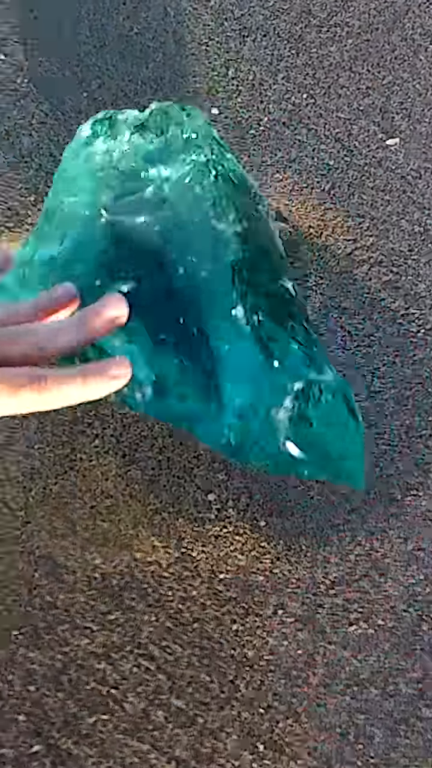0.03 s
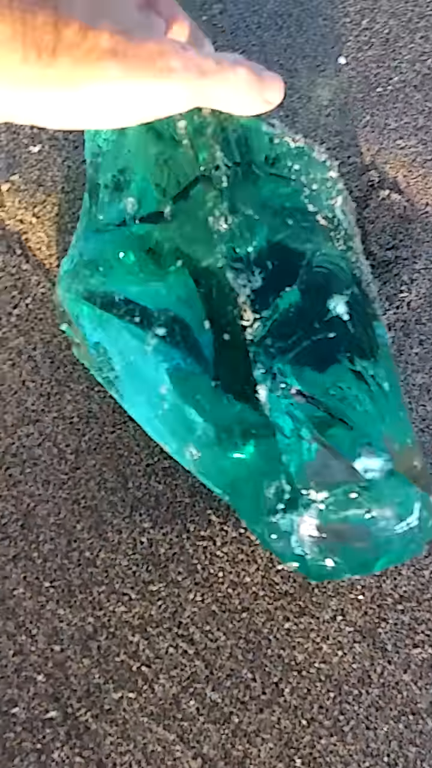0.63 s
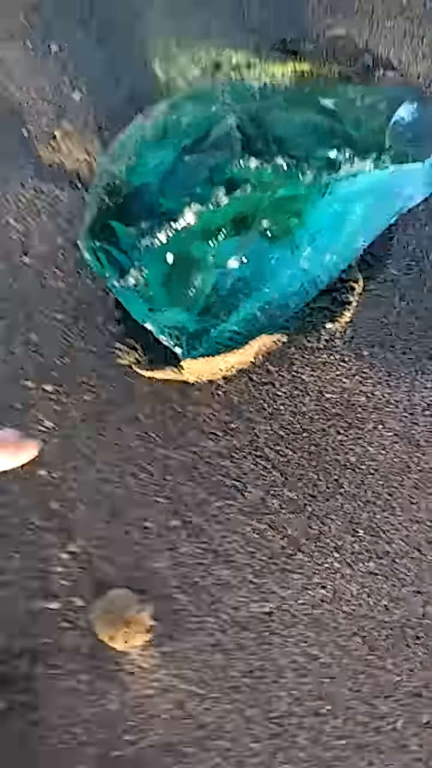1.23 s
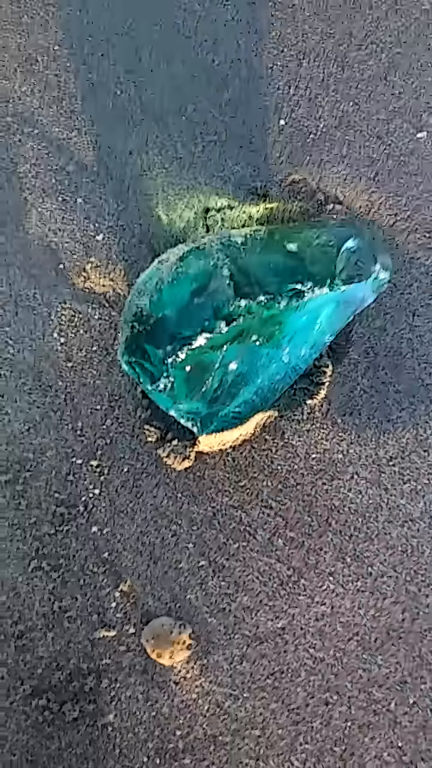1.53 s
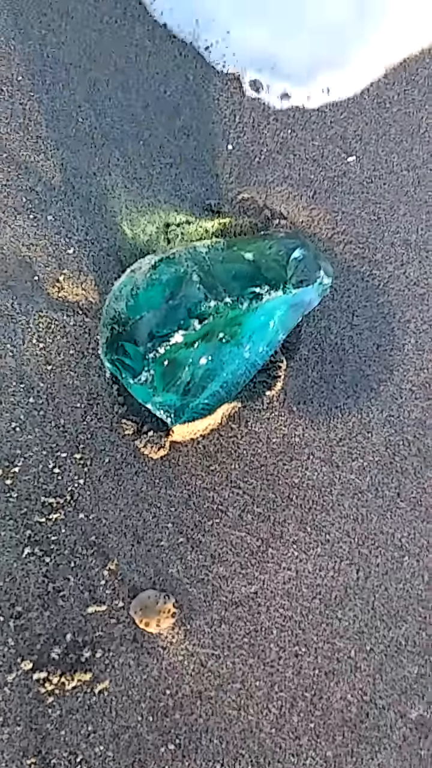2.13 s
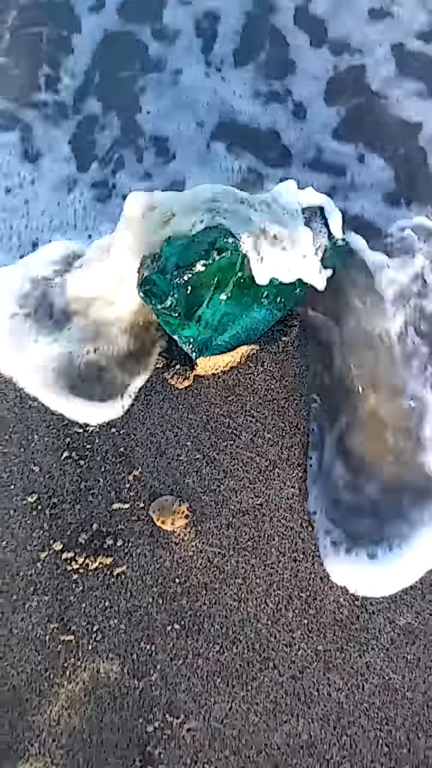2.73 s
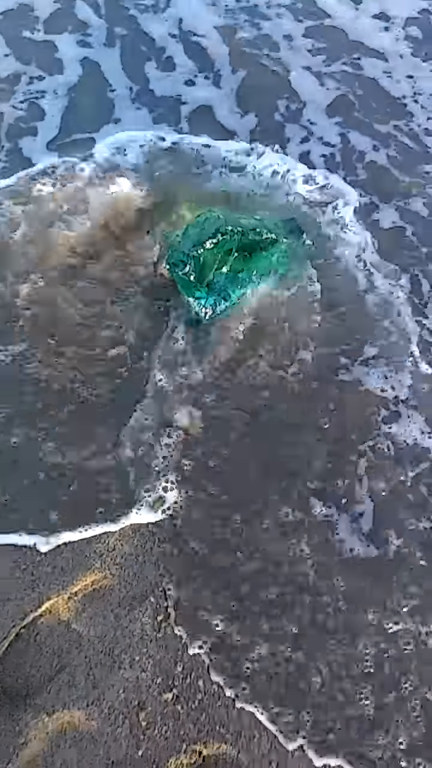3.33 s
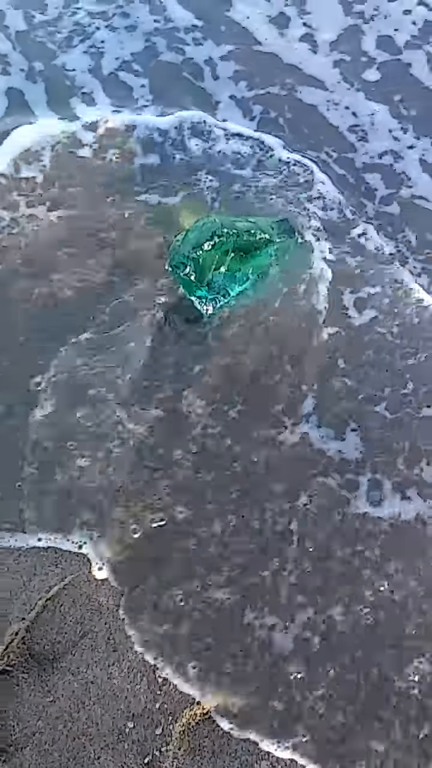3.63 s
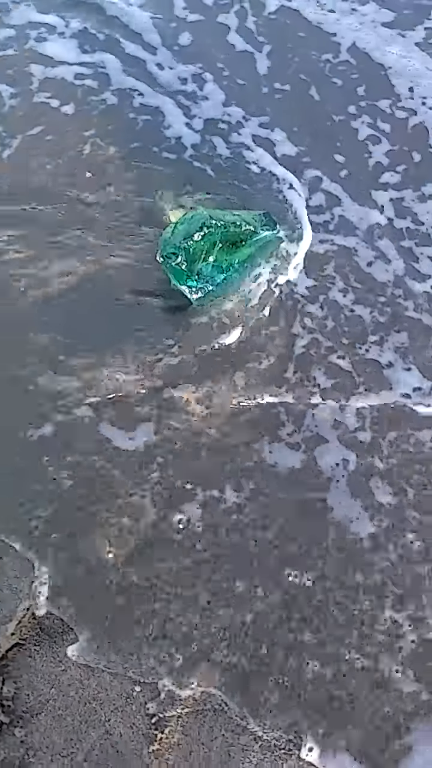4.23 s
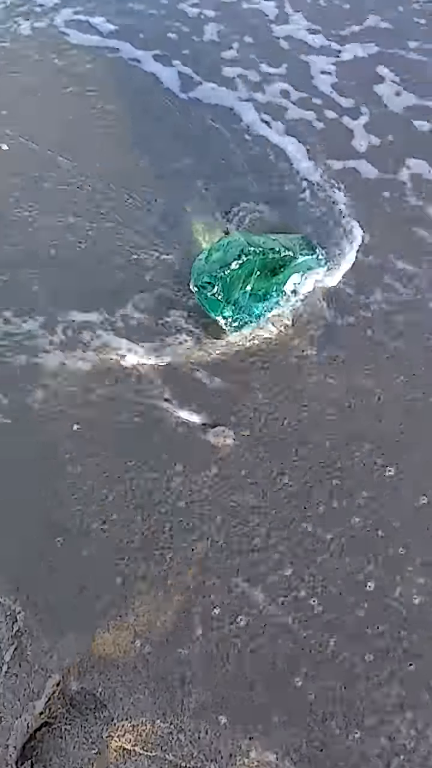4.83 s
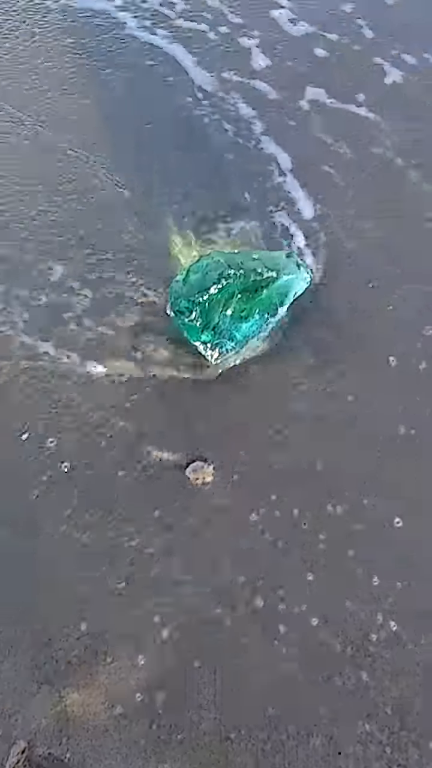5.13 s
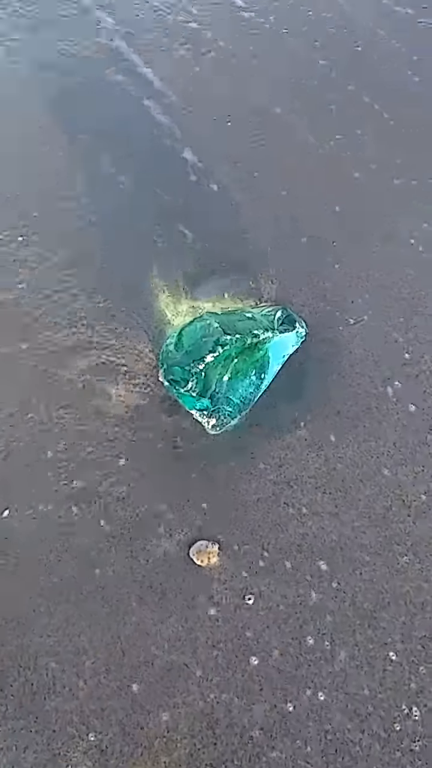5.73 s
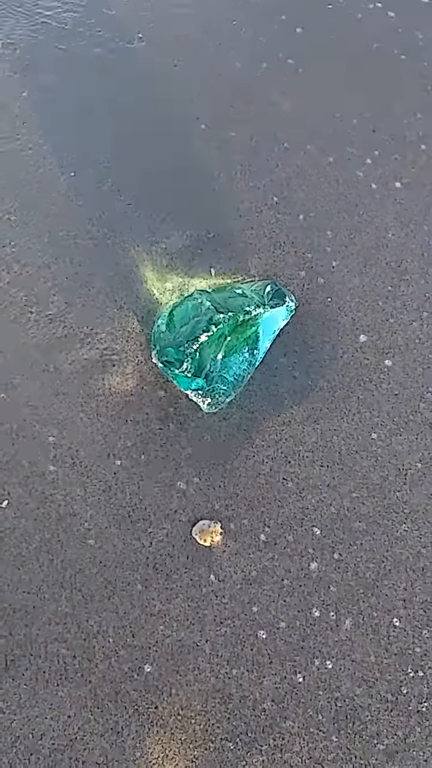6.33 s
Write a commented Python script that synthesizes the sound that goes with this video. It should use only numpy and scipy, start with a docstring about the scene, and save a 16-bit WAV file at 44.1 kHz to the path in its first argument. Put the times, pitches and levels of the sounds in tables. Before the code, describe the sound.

Gusty wind thumps on the microphone as a glass block crunches in wet sand, then a foamy wave washes up and drains away.

```python
"""On a windy beach, a block of glass is turned over in wet sand, which crunches and hisses.
Then a foamy wave runs up around it and drains back: the water rushes and bubbles, its thin
sheet hisses over the sand, and the foam fizzes. Loudest of all, gusts sweep eddies (swirls of
air) over a phone's microphone opening, making a fluttering rumble with sharp thumps.
A limiter holds down the peaks."""
import sys
import numpy as np
from scipy import signal
from scipy.fft import rfft, irfft
from scipy.io import wavfile
from scipy.ndimage import uniform_filter1d, minimum_filter1d, map_coordinates

SR = 44100
rng = np.random.default_rng(int(sys.argv[2]) if len(sys.argv) > 2 else 0)


def unload_wav(signal):
    """Save mono or channel-first audio to the path in sys.argv[1] as 16-bit WAV at rate SR, clipped to [-1, 1]."""
    wavfile.write(
        sys.argv[1],
        SR,
        np.round(np.clip(np.atleast_2d(signal).T, -1, 1) * 32767).astype(np.int16),
    )


N = 282240

# The hardest eddies to hit the microphone. Each row: time in seconds, relative peak in dB, pitch in Hz.
HARD_EDDIES = [(0.218, -1, 387), (.389, 0, 514), (.457, 0, 860), (0.63, -5, 454), (.768, 4, 416),
               (.866, 7, 430), (.927, 6, 373), (0.973, -2, 690), (.99, -4, 610), (1.018, -3, 500),
               (1.086, 2, 383), (1.122, -2, 342), (1.186, -4, 499.5), (1.212, 2.5, 353), (1.333, 2, 506),
               (1.366, -16, 496), (1.407, -5, 620), (1.422, 0, 519), (1.444, -9, 600), (1.531, -1, 377.5),
               (1.645, -3, 517), (1.678, -2, 651), (1.714, -1, 470), (1.75, -8, 376), (1.762, -3.5, 885),
               (1.768, -1, 660), (1.824, 5, 596), (1.836, -5, 480), (2.581, -15, 480.6), (2.592, -1, 643),
               (2.715, -3.5, 440), (2.789, -4.5, 570.6), (2.854, -2, 498.8), (3.053, 2.5, 397.4),
               (3.129, -0.5, 398.8), (3.139, 3, 664.5), (3.318, -5, 850), (3.326, -2, 429.6),
               (3.444, -8, 430), (3.485, 0, 598.3), (3.739, -6, 478), (5.045, -9, 443)]
# The tone of bursting foam and of the finest sand. Each row: frequency in Hz, relative level in dB.
FIZZ_SPECTRUM = [(3500, -25), (5200, -11), (6200, -9), (7000, -2), (7700, 0), (8400, -2.5), (9400, -10.5),
                 (11500, -11.5), (13500, -14.5), (15700, -17)]


def air():
    """Gusts rise, hold and die back into the breeze. Gives the air's level in dB and pace in octaves."""
    # Each row: start in seconds, hold in seconds, level in dB, pace in octaves above the usual.
    gusts = [(.375, 0.11, -10.5, .08), (0.523, .25, -16, -0.13), (.915, .11, -12.5, -0.047),
             (1.08, .135, -13, -.15), (1.328, 0.13, -13.5, 0.19), (1.502, 0.029, -11, -.1),
             (1.598, 0.25, -13, .2), (2.091, .016, -21, 0), (2.169, .055, -17, -0.54),
             (2.293, 0.19, -26, -.45), (2.59, 0.034, -13, -0.045), (2.696, 0.034, -13, 0),
             (2.775, .1, -14, -0.054), (3.085, .07, -13, -.15), (3.2, .14, -14, -0.044),
             (3.42, 0.082, -13, -0.013), (3.617, .035, -11, -0.14), (3.691, 0.086, -16, 0.054),
             (3.934, 0.031, -16.5, -0.019), (4.08, .02, -17, 0), (4.202, .012, -17, 0.0059),
             (4.294, 0.028, -15, 0.065), (5.01, 0.066, -19.5, 0.16), (5.408, .012, -22, -0.22),
             (5.626, 0.055, -34.5, -.1)]
    # The light air between gusts. Each row: time in seconds, level in dB.
    breeze = [(0, -19), (1.25, -21), (1.85, -21), (1.96, -23), (2.01, -39), (2.26, -37), (2.6, -22),
              (3.9, -21), (4.3, -25), (4.45, -33), (4.65, -39), (5.15, -36), (5.9, -46.5), (6.4, -42.5)]
    attack_s, release_s, breeze_octaves = .014, .016, -.05
    t = np.arange(N) / SR
    power = undb(curve(breeze)) ** 2
    weighted_pace = power * breeze_octaves
    for start, hold, db, octaves in gusts:
        rise = np.exp(-(np.maximum(start - t, 0) / attack_s) ** 2)
        fall = np.exp(-np.maximum(t - start - hold, 0) / release_s)
        gust_power = (undb(db) * rise * fall) ** 2
        power += gust_power
        weighted_pace += gust_power * octaves
    return 10 * np.log10(power), weighted_pace / power


def wind_rumble(air_db, pace):
    """A pattern of eddies sweeps past the microphone: faster air sounds both louder and higher."""
    # The tone of the eddies at speed 1. Each row: frequency in Hz, relative level in dB.
    eddy_spectrum = [(25, -41), (42, -46), (70, -12), (125, -3.5), (220, 1.5), (450, -3.5), (700, -12.5),
                     (1000, -22), (1500, -39.5), (2500, -58), (4000, -53.5)]
    t = np.arange(N) / SR
    # A dying breeze breaks up into separate puffs.
    puff_depth_db = np.interp(air_db, [-38, -26], [3.5, .4])
    level_db = air_db + puff_depth_db * (wander(8.56) - .4)
    flutter_db = 6.2 * np.tanh(wander(66) / 2)
    # The air hurries for a moment around each of the hardest eddies.
    surges = sum(np.interp(t, [s - .008, s, s + .012], [0, hz / 800, 0]) for s, _, hz in HARD_EDDIES)
    hurry = np.tanh(surges)
    speed = 2 ** (pace - .07 + .02 * (level_db + 15) + .04 * flutter_db + .45 * hurry)
    pattern = colour(rng.standard_normal(N), eddy_spectrum)
    # Even out the pattern so that it adds no swells of its own.
    pattern /= np.sqrt(uniform_filter1d(pattern ** 2, size=1000, mode="wrap"))
    position = np.cumsum(speed) % (N - 1)
    swept = map_coordinates(pattern, [position], order=3, mode="wrap")
    return unit(swept * undb(flutter_db)) * undb(level_db + .32 + .83 * hurry)


def lesser_eddies(air_db, pace):
    """Strong air sheds extra eddies at random. Gives rows like those of HARD_EDDIES."""
    per_s, usual_hz, weakest_air_db = 16, 500, -16
    eddies = []
    for slot, (when, size, pitch) in enumerate(rng.random((int(per_s * N / SR), 3))):
        time_s = (slot + when) / per_s
        i = min(int(time_s * SR), N - 1)
        if air_db[i] > weakest_air_db:
            peak_db = air_db[i] + 7 + 7 * (size - .5)
            hz = usual_hz * 2 ** (pace[i] + .6 * (pitch - .5))
            eddies.append((time_s, peak_db, hz))
    return eddies


def wind_thumps(eddies):
    """An eddy gives the microphone one push and one pull; the faster it passes, the higher it sounds."""
    core_db, core_speedup = -24.5, 1.87  # its sharp core is weaker and passes faster
    out, t = np.zeros(N), np.arange(N) / SR
    push_pull = lambda phase: phase * np.exp((1 - phase ** 2) / 2)
    for (time_s, db, hz), sign in zip(eddies, rng.choice([-1, 1], len(eddies))):
        phase = 2 * np.pi * hz * (t - time_s)
        near = np.abs(phase) < 10
        core = undb(core_db) * push_pull(core_speedup * phase[near])
        out[near] += sign * undb(db - .8) * (push_pull(phase[near]) + core)
    return out


def wave():
    """Water rushes and bubbles up the beach, and its thin sheet hisses back over the sand."""
    # The swell of the rushing water. Each row: time in seconds, relative level in dB.
    rush_levels = [(1.3, -53), (1.7, -49), (2.1, -56.5), (2.45, -56), (2.85, -39), (3.6, -35.5),
                   (4.25, -31.5), (5.1, -31), (5.7, -35.5), (6.4, -42)]
    # The tones of the rush and of the thin sheet. Each row: frequency in Hz, relative level in dB.
    rush_spectrum = [(150, -18), (320, -6), (390, -0.5), (460, 2), (600, 5.5), (750, 2.5), (860, 3),
                     (1020, 3.5), (1250, 3), (1550, 2.5), (1850, 1.5), (2050, -4), (2300, -15), (3200, -48)]
    sheet_spectrum = [(1800, -9), (2300, -9), (2600, -1), (2850, 3.5), (3300, 2), (4100, 3), (4800, -6),
                      (6000, -10), (9000, -27)]
    turn_s, turn_ease_s = 4.25, .45  # when the flow turns back, and how gently
    fade_in = curve([(1.2, 0), (1.9, .91)])
    rush_db = curve(rush_levels)
    draining = .5 + .5 * np.tanh((np.arange(N) / SR - turn_s) / turn_ease_s)
    # The sheet hisses more as it drains and thins; wet sand always keeps a faint hiss.
    sheet_db = np.maximum(rush_db - 7 + 6 * draining, -54.5)
    rush = colour(grains(per_s=1500, spread_db=1.5, pop_share=.24), rush_spectrum)
    rush *= undb(rush_db + 6 + .9 * wander(11))
    trickle = bubbles(per_s=160, low_hz=469, high_hz=1893, cycles=9, spread_db=3) * undb(rush_db + 1.5)
    sheet = colour(grains(per_s=2500, spread_db=4, pop_share=.35), sheet_spectrum)
    sheet *= undb(sheet_db + .43 * wander(7.2))
    prickle = bubbles(per_s=220, low_hz=2687, high_hz=4420, cycles=15.5, spread_db=5)
    prickle *= undb(sheet_db - 8.5)
    return (rush + trickle + sheet + prickle) * fade_in


def bubbles(per_s, low_hz, high_hz, cycles, spread_db):
    """Trapped air rings briefly, rising in pitch as it nears the surface."""
    out = np.zeros(N + SR)
    for when, pitch, strength in rng.random((int(per_s * N / SR), 3)):
        hz = low_hz * (high_hz / low_hz) ** pitch
        age = np.arange(int(5 * cycles * SR / hz)) * hz / (SR * cycles)  # counted in decay times
        ring = np.sin(2 * np.pi * cycles * age * (1 + .019 * age)) * np.exp(-age)
        level_db = -spread_db * np.log(max(1 - strength, .02))  # most are quiet, a few are loud
        start = int(when * N)
        out[start:start + len(age)] += ring * undb(level_db)
    return unit(out[:N])


def sand():
    """Wet grains crunch, hiss and sparkle under the turning block, then drop to a faint trace."""
    # The grinding. Each row: time in seconds, relative crunch level in dB, relative hiss level in dB.
    grind_levels = [(0, -27.5, -43), (.1, -27.5, -45), (.18, -28.5, -35), (.52, -29, -28.5),
                    (.72, -29, -31.5), (.97, -37.5, -47.5), (1.3, -47, -51)]
    # The tones of the crunch and of the hiss. Each row: frequency in Hz, relative level in dB.
    crunch_spectrum = [(300, 4), (600, 5), (1400, 1.5), (2000, -4.5), (2500, -11), (3200, -21.5),
                       (4500, -41)]
    hiss_spectrum = [(1800, -13), (2700, -8), (3200, -1.5), (3900, -2), (5200, -1.5), (6300, -6.5),
                     (8000, -8.5), (10000, -13.5), (15000, -37)]
    crunch_db, hiss_db = curve(grind_levels, column=1), curve(grind_levels, column=2)
    settling = curve([(1.2, .92), (1.34, .21)])  # the block comes to rest
    crunch = colour(grains(per_s=2500, spread_db=2.5, pop_share=.58), crunch_spectrum)
    crunch *= undb(crunch_db + 9 + wander(17))
    hiss = colour(grains(per_s=4000, spread_db=3, pop_share=.31), hiss_spectrum)
    hiss *= undb(hiss_db + 2.5 + .8 * wander(25))
    sparkle = colour(grains(per_s=3000, spread_db=1, pop_share=.27), FIZZ_SPECTRUM) * undb(hiss_db - 2.5)
    return (crunch + hiss + sparkle) * settling


def foam():
    """Tiny bubbles burst on the wet sand and in the foam, making a high fizz."""
    # The strength of the fizz. Each row: time in seconds, relative level in dB.
    fizz_levels = [(0, -39), (.8, -39), (.98, -45), (1.15, -40), (1.35, -52.5), (1.48, -55), (1.6, -46),
                   (2.2, -45), (3.05, -36), (3.25, -39), (4.7, -35), (5.6, -36), (6.4, -40.5)]
    fizz = colour(grains(per_s=3000, spread_db=2, pop_share=.36), FIZZ_SPECTRUM)
    return fizz * undb(curve(fizz_levels) + .6 + .25 * wander(30))


def grit_and_drops():
    """Grit ticks as the block is handled, and drops splash: short bursts of noise around a pitch."""
    # Each row: middle in seconds, level in dB, pitch in Hz, width in octaves, fade time in seconds.
    ticks = [(1.078, -46, 4997, 0.34, .045), (1.131, -43, 8000, 0.38, .015), (1.246, -36.5, 8300, .4, 0.01),
             (1.364, -46, 5160, .25, 0.0044), (1.678, -46, 5668, .25, .025),
             (2.877, -36.5, 2600, .25, 0.014), (2.942, -37, 8160, 0.52, 0.014),
             (3.092, -39.5, 3406, 0.22, 0.022), (3.289, -43, 4072, .15, 0.0086)]
    out, t = np.zeros(N), np.arange(N) / SR
    for middle_s, db, hz, width, fade_s in ticks:
        band = [(hz / 4 ** width, -18), (hz, 0), (hz * 4 ** width, -18)]
        burst = colour(rng.standard_normal(N), band)
        out += burst * undb(db) * np.exp(-((t - middle_s) / fade_s) ** 2)
    return out


def grains(per_s, spread_db, pop_share):
    """Countless tiny pops of uneven size, over the smooth hiss of those too far off to tell apart."""
    clicks = (rng.random(N) < per_s / SR) * rng.choice([-1, 1], N)
    sizes = undb(spread_db * np.minimum(rng.exponential(size=N), 5))
    return np.sqrt(pop_share) * unit(clicks * sizes) + np.sqrt(1 - pop_share) * rng.standard_normal(N)


def colour(noise, spectrum):
    """Shape white noise to rows of frequency in Hz and level in dB, fading beyond both ends."""
    hz, db = np.transpose(spectrum)
    f = np.maximum(np.fft.rfftfreq(len(noise), 1 / SR), 1)
    gain = undb(np.interp(np.log(f), np.log(hz), db))
    roll_off = np.minimum(f / hz[0], 1) ** 2 * np.minimum(hz[-1] / f, 1) ** 2
    return unit(irfft(rfft(noise) * gain * roll_off, len(noise)))


def wander(per_s):
    """A smooth random wobble of typical size 1 that changes about per_s times a second."""
    ratio = np.fft.rfftfreq(N, 1 / SR) / per_s
    return unit(irfft(rfft(rng.standard_normal(N)) * ratio / (1 + ratio ** 2) ** 2, N))


def curve(table, column=1):
    """Join the values in one column of a table with straight lines over time."""
    rows = np.array(table)
    return np.interp(np.arange(N) / SR, rows[:, 0], rows[:, column])


def unit(x):
    """Scale a signal to an average strength (rms) of 1."""
    return x / np.sqrt(np.mean(x ** 2))


def undb(db):
    """Turn decibels into a number to multiply by."""
    return 10 ** (np.asarray(db) / 20)


def scene():
    """Wind on the microphone in front of sand, water and foam, in one channel."""
    beach = sand() + wave() + foam() + grit_and_drops()
    air_db, pace = air()
    rumble = wind_rumble(air_db, pace)
    thumps = wind_thumps(list(HARD_EDDIES) + lesser_eddies(air_db, pace))
    return (rumble + thumps + beach)[None]


def record(dry):
    """A fast limiter turns down the loudest thumps; the deepest bass and highest treble are cut."""
    low_cut_hz, high_cut_hz = 48, 15700
    ceiling, window_samples = .97, 100
    sound = signal.sosfilt(signal.butter(4, low_cut_hz, "high", fs=SR, output="sos"), dry)
    needed_gain = ceiling / np.maximum(np.abs(sound), ceiling)
    held_gain = minimum_filter1d(needed_gain, size=window_samples)
    limited = sound * uniform_filter1d(held_gain, size=window_samples)
    return signal.sosfilt(signal.ellip(12, .1, 80, high_cut_hz, fs=SR, output="sos"), limited)


dry = scene()
out = record(dry)
unload_wav(out)
```